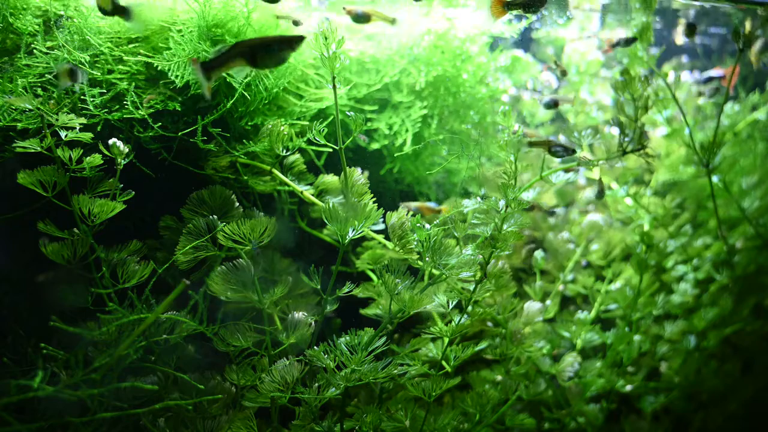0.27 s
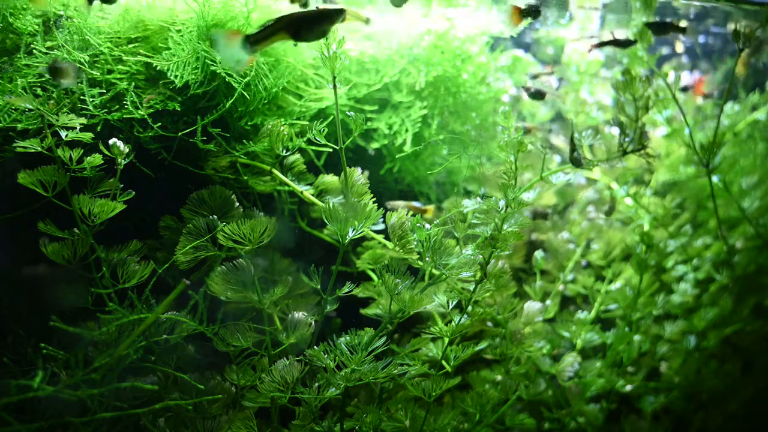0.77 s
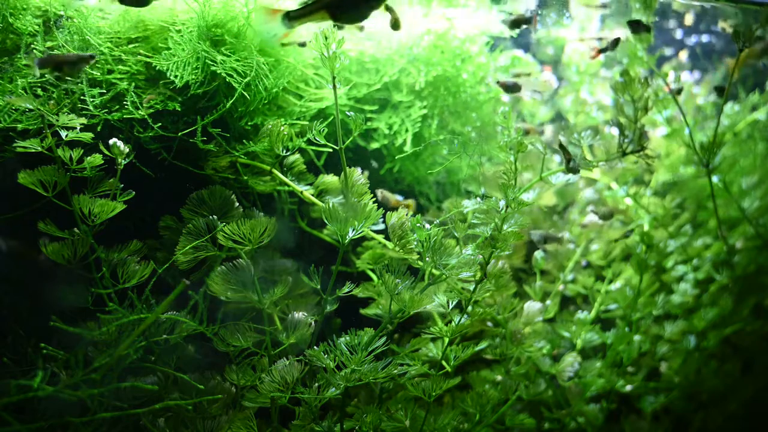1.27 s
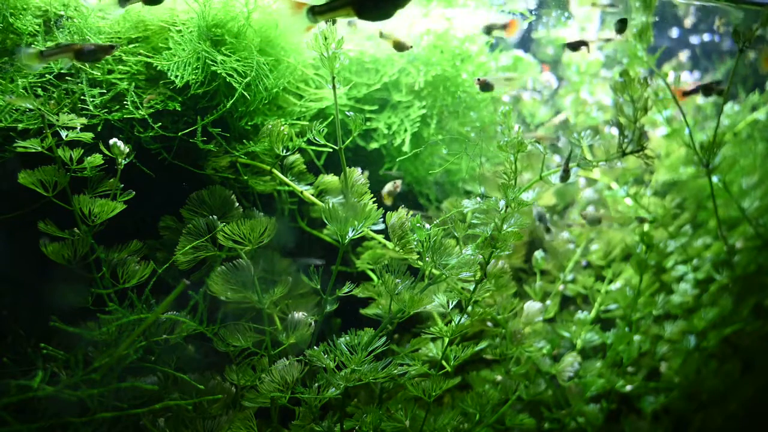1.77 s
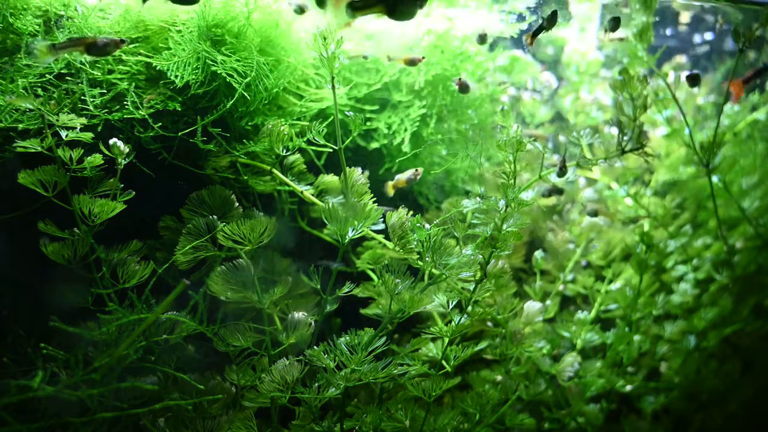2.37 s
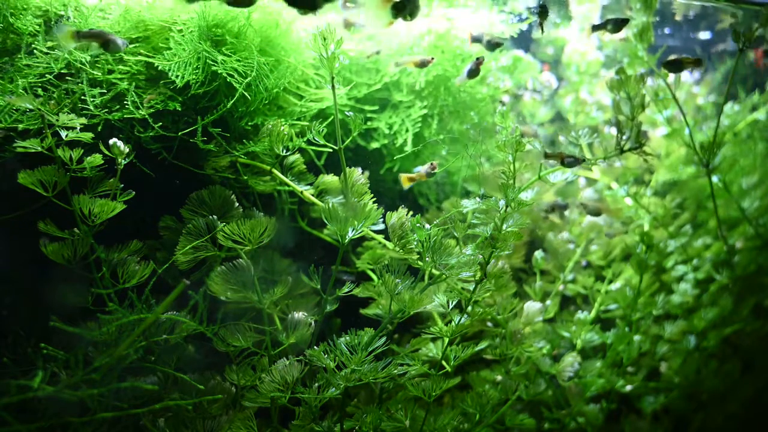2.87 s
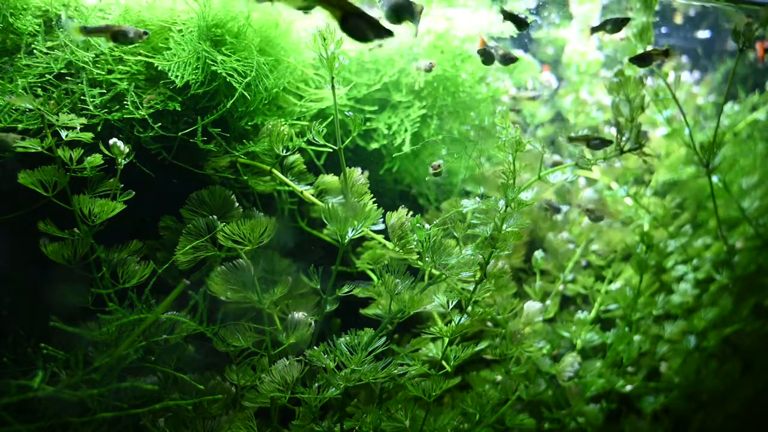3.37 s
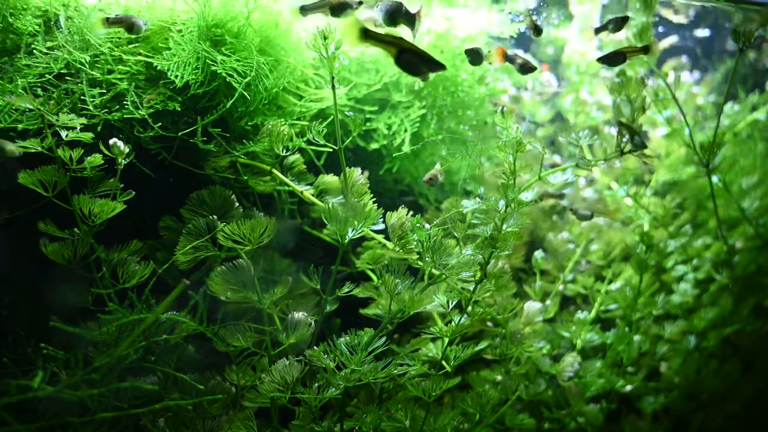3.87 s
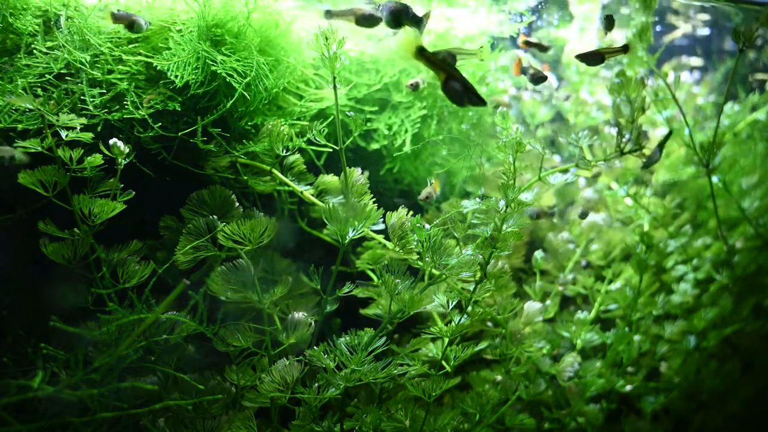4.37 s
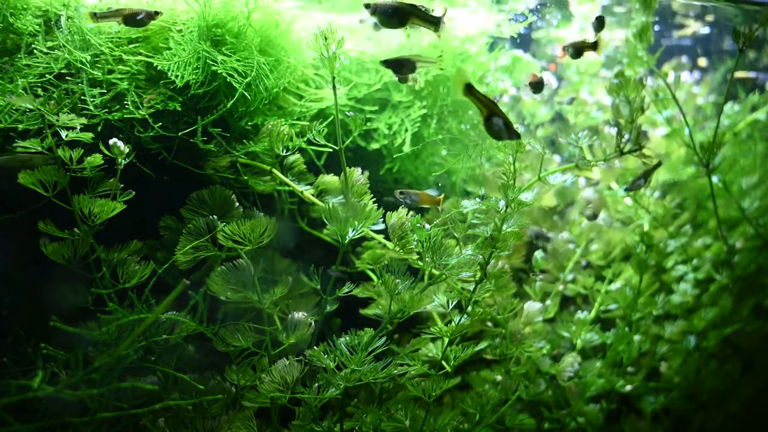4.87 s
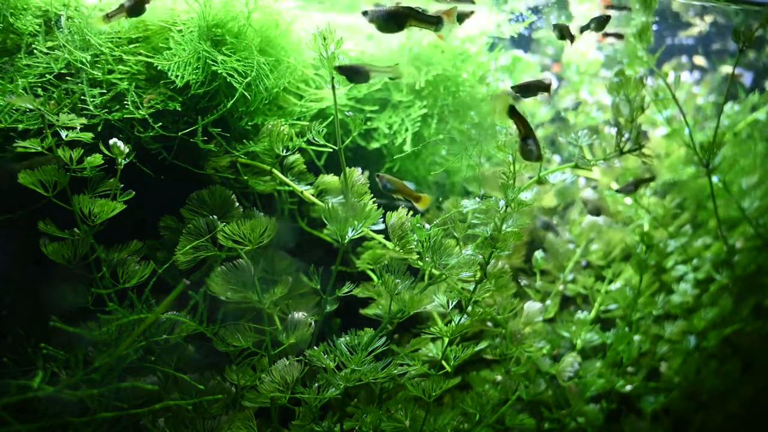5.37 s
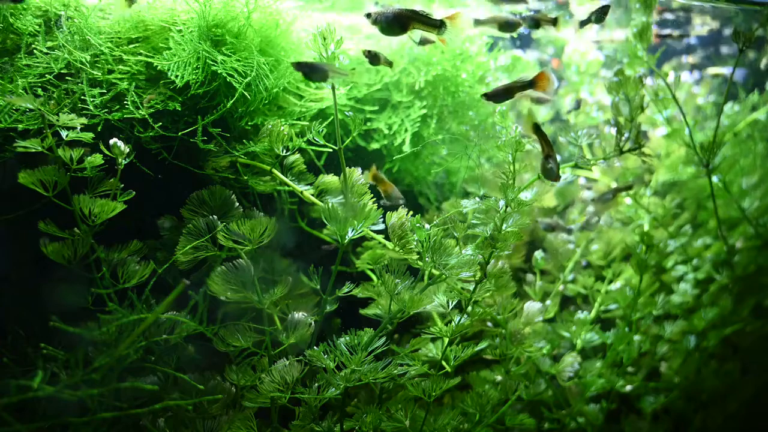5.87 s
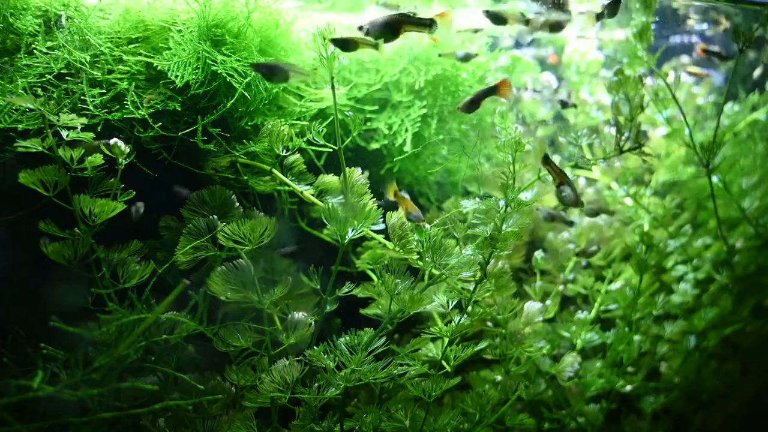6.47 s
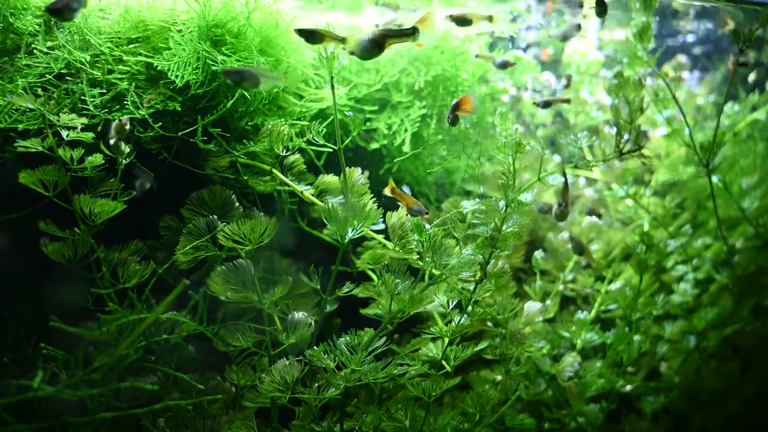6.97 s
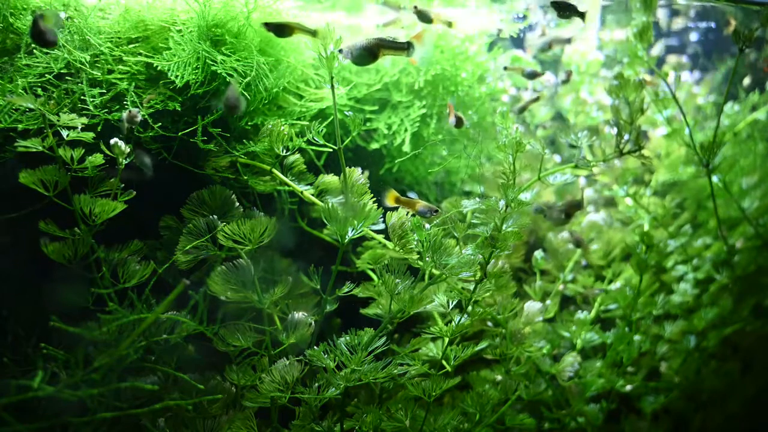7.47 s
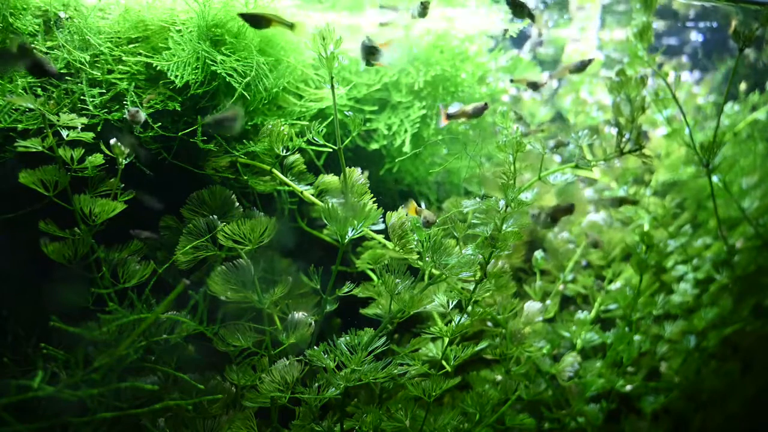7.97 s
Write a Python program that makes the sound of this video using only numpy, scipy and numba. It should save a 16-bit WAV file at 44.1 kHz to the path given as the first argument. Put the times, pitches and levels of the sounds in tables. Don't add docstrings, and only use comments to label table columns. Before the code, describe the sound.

Aquarium pump hums constantly beneath a gentle wash of water while bright little bubbles crackle, tick and plop at random in a quiet room.

```python
import sys
import numpy as np
from scipy import signal
from scipy.fft import rfft, irfft, next_fast_len
from scipy.io import wavfile
from scipy.ndimage import uniform_filter1d
from numba import njit

SR = 44100
rng = np.random.default_rng(int(sys.argv[2]) if len(sys.argv) > 2 else 0)


def boost(x):
    u = np.asarray(x, float) / 20
    return 10 ** u


def digitize_waveform(pressure):
    field = np.atleast_2d(pressure).T
    bounded = np.clip(field, -1, 1)
    quanta = np.round(bounded * 32767).astype(np.int16)
    wavfile.write(sys.argv[1], SR, quanta)


N = 362502
SIZE = next_fast_len(N + SR // 2)
HZ = np.arange(SIZE // 2 + 1) * SR / SIZE
MAINS_HZ = 59.996
PORT_LAG_S = 6 / SR


def along_hz(table):
    hz, value = np.transpose(table)
    return np.interp(np.log(HZ + 1), np.log(hz), value)


def walk(rate):
    hold = int(SR / rate)
    held = np.repeat(rng.standard_normal(N // hold + 1), hold)
    return 1.74 * uniform_filter1d(uniform_filter1d(held, hold), hold)[:N]


def ports(x, lag_s):
    delay = np.exp(-2j * np.pi * HZ * lag_s)
    late = irfft(rfft(x, SIZE) * delay, SIZE)[:len(x)]
    return np.array([late, x])


def diffuse(length, alike_hz, steep):
    both, left, right = rfft(rng.standard_normal((3, SIZE)))
    alike = .985 / (1 + (HZ / alike_hz) ** steep)
    spectrum = np.sqrt(alike) * both + np.sqrt(1 - alike) * np.array([left, right])
    return irfft(spectrum, SIZE)[:, :length]


def hum():
    # multiple of the mains, level/dB rms
    multiples = [(1, -58), (2, -43), (4, -68), (5, -72), (6, -51), (7, -68), (8, -72), (9, -75), (10, -75),
                 (12, -78), (16, -74), (18, -74), (28, -79), (43, -80), (49, -81), (53, -78), (62, -83)]
    # t/s, level/dB rms
    third = [(0.0, -60), (0.07, -61), (0.32, -53), (1.76, -57.5), (2.05, -50), (2.12, -60.5), (3.29, -49),
             (3.47, -65), (4.25, -51), (4.61, -62), (6.12, -51.5), (6.28, -59), (7.1, -64), (7.17, -54.5),
             (7.76, -62), (7.9, -50.5), (8.2, -56)]
    t = np.arange(N) / SR
    impeller_hz, impeller_db = 29.55, -74
    impeller = boost(impeller_db + 2.5 * walk(3)) * np.sin(2 * np.pi * impeller_hz * t)
    out = impeller * np.ones((2, 1))
    third_db = np.interp(t, *np.transpose(third)) - .7
    for k, db in [*multiples, (3, third_db)]:
        wobble_db = min(0.097 * k, .8) * walk(7.7)
        turn = .28 * k ** 2
        lag_s = 1.4 * PORT_LAG_S * np.exp(-k / 22) * np.array([[1], [0]])
        out += boost(db + 3.5 + wobble_db) * np.sin(2 * np.pi * (k * MAINS_HZ * (t - lag_s) + turn))
    return out


def rush():
    # f/Hz, spectral level/dB
    slope = [(20, -14), (40, -11), (80, -6), (200, -3.5), (420, -8), (620, -12), (1100, -10), (1750, -12.5),
             (2300, -15.5), (3100, -14.5), (4000, -18.5), (8000, -21), (11000, -23.5), (16000, -26)]
    # f/Hz, width/Hz, level/dB
    bodies = [(28.8, 5.4, 0), (55, 22, 4.5), (74.7, 5.4, -2), (88, 9, 4), (167, 40, 4), (217, 7.7, -16),
              (253.5, 22, 3), (340, 64, -2.5), (474, 10.6, 5.5), (584, 75, -0.5), (687, 48, 5),
              (822, 115, 5), (1038, 100, 5.5), (1246, 86, 4.5), (1526, 44, 1.5), (1623, 21, 5),
              (2590, 240, 5), (3430, 81, 5)]
    rush_db = -47
    power = 1
    for hz, width, db in bodies:
        power = power + boost(2 * db) / (1 + (2 * (HZ - hz) / width) ** 2) ** 2
    noise = diffuse(N, 1790, 2.94) + boost(-6) * ports(rng.standard_normal(N), PORT_LAG_S)
    spectrum = rfft(noise, SIZE) * boost(along_hz(slope)) * np.sqrt(power)
    stroke = np.exp(1.3 * np.cos(2 * np.pi * MAINS_HZ * np.arange(N) / SR))
    stroke = stroke / stroke.mean() - 1
    octave = np.log2((HZ + 1) / 30)
    flow, spatter = walk(15), walk(35)
    out = 0
    for k in range(10):
        window = np.cos(np.pi / 2 * np.clip(octave - k, -1, 1)) ** 2
        band = irfft(spectrum * window, SIZE)[:, :N]
        throb = .09 * np.exp(-((k - 4.3) / 1.3) ** 2) + .025
        shared_db = .7 * flow * (3 < k < 7) + .07 * k * spatter * (k > 6)
        flicker_db = .8 if k < 7 else .25
        out = out + band * (1 + throb * stroke) * boost(shared_db + flicker_db * walk(9))
    return out * boost(rush_db) / np.sqrt(np.mean(out ** 2))


def lasting_ms(hz):
    return 4.6 * (4000 / hz) ** 0.76


@njit
def rings(start, size, hz, ring_s, glide):
    out = np.zeros(N)
    for k in range(len(start)):
        z = size[k] + 0j
        step = 2 * np.pi * hz[k] / SR
        shut = 1.
        fade = np.exp(-1 / (ring_s[k] * SR))
        for i in range(start[k], min(start[k] + int(6 * ring_s[k] * SR), N)):
            z *= fade * np.exp(1j * step)
            shut *= fade ** 8
            step = min(step * (1 + glide[k] / (ring_s[k] * SR)), 2.3)
            out[i] += (1 - shut) * z.imag
    return out


def bursts(s, db, hz, ring_ms, cycles, scatter, count=4):
    later, pitch, size, slide = rng.random((len(s), 4, count)).transpose(1, 2, 0)
    first = np.arange(count)[:, None] == 0
    start = s + 1.3 * ring_ms / 1000 * later * ~first
    step_hz = np.minimum(hz * np.where(first, 1.05, 1 + scatter * (pitch - .5)), 16000)
    step_db = db - (5.0 + 6.0 * size) * ~first
    ring_s = cycles * (1.14 + 0.049 * ring_ms * np.ones_like(size)) / step_hz
    glide = -.075 * (slide.ravel() + .3)
    start_sample = (start * SR).astype(np.int64).ravel()
    return rings(start_sample, boost(step_db).ravel(), step_hz.ravel(), ring_s.ravel(), glide)


def scattered(top_db, spread_db, low_hz, high_hz, lean, count):
    when, size, pitch = rng.random((count, 3)).T
    hz = low_hz * (high_hz / low_hz) ** pitch ** lean
    return np.transpose([when * N / SR, top_db - spread_db * size, hz])


def room(lag_s):
    # delay/ms, level/dB
    echoes = [
        (5.7, -3.5),
        (11.8, -11),
    ]
    t60_s, tail_db = 0.13, -1.3
    t = np.arange(SR // 3) / SR
    tail = diffuse(len(t), 1500, 2.8) * np.exp(-np.log(1000) * t / t60_s) * np.minimum(t / 0.0014, 1)
    response = tail * boost(tail_db) / np.sqrt(np.sum(tail ** 2) / 2)
    response += ports(1. * (t == t[8]), lag_s)
    for ms, db in echoes:
        response[[0, 1], int(ms * SR / 1000) + rng.integers(0, 9, size=2)] += boost(db)
    return rfft(response, SIZE) / np.sqrt(1 + (900 / (HZ + 1)) ** 4)


def fizz(count=1200):
    when, pitch, size = rng.random((count, 3)).T
    hz = 2000 * (15500 / 2000) ** pitch ** 1.1
    size_db = -55.5 - 0.42 * np.log2(hz / 4000) - 3.25 * np.log(size + 0.018)
    return bursts(when * N / SR, size_db, hz, 7.9, 5.44, 0.19, count=2)


def ticks(rows, larger):
    s, db, hz = rows.T
    pop_s, pop_db = np.vstack([larger, rows]).T[:2]
    spray_hz = rng.uniform(8000, 11500, len(pop_s))
    spray = bursts(pop_s, pop_db + 4.0, spray_hz, 4.0, 0.7, .7, count=6)
    smallest = bursts(s + .0003, db + 12.5, hz, 1.3 * lasting_ms(hz), 2.1, 0.33, count=5)
    return rfft(smallest + spray + fizz(), SIZE) * room(PORT_LAG_S) * boost([[-1.5], [1.0]])


def pops(rows):
    s, db, hz = rows.T
    loud_db = db + 2.76 + 1.3 * np.log2(hz / 3000)
    return rfft(bursts(s, loud_db, hz, lasting_ms(hz), 5.2, 0.25, count=4), SIZE) * room(-1 / SR)


def scene():
    large = [(0.096, -45, 3410), (0.757, -44, 2980), (1.171, -45, 2920), (1.542, -47, 2620),
             (1.764, -37.5, 3000), (1.992, -45.5, 2530), (3.183, -46.5, 2430), (3.603, -44.5, 3450),
             (3.687, -46, 3350), (3.973, -45, 3500), (3.986, -43.5, 2280), (4.222, -42, 2950),
             (4.292, -46, 3390), (4.38, -46, 2440), (4.662, -45, 3370), (4.943, -42.5, 3030),
             (5.378, -45, 3900), (5.926, -45, 3420), (5.981, -39.5, 2210), (6.063, -44, 2580),
             (6.31, -48, 2590), (6.428, -39, 2870), (6.438, -44, 3000), (6.527, -44, 3520),
             (6.776, -43, 3410), (7.321, -46, 2930), (7.534, -39, 2920), (7.831, -42, 3110),
             (8.034, -41, 3320), (8.085, -46, 3430)]
    # t/s, peak level/dB, f/Hz
    pings = [(0.265, -41, 4230), (0.341, -40.5, 6240), (0.585, -39.5, 5900), (0.71, -46.5, 4380),
             (1.14, -46, 4600), (1.72, -49, 7770), (2.345, -44, 4100), (2.739, -45, 4860),
             (3.212, -43, 5140), (3.299, -44, 5700), (3.426, -48, 7440), (3.471, -41.5, 4590),
             (3.556, -45, 5960), (3.716, -40, 4440), (3.876, -46, 4200), (4.069, -46, 5600),
             (4.445, -41.5, 4500), (4.626, -46, 4550), (5.032, -47, 4950), (5.076, -41, 4830),
             (5.114, -47, 4850), (5.244, -46, 5740), (5.273, -47, 4400), (5.515, -40, 4750),
             (5.906, -44, 4460), (6.864, -48, 4600), (7.287, -46, 4350), (7.802, -40.5, 4900),
             (7.831, -45, 5140), (7.978, -46, 5690)]
    # t/s, peak level/dB, f/Hz
    softer_pops = [(0.445, -49, 5000), (1.13, -45, 5400), (1.519, -47, 4800), (1.699, -49, 4690),
                   (1.863, -48, 2600), (2.184, -48, 1900), (2.682, -46, 2550), (2.973, -49, 3430),
                   (3.038, -47, 5710), (3.72, -43, 3480), (4.058, -49, 3850), (4.466, -46, 7000),
                   (4.655, -46, 5590), (4.694, -49, 4750), (4.77, -46, 4330), (4.884, -48, 6200),
                   (5.763, -48, 3320), (6.042, -50, 4750), (6.43, -47, 4500), (6.578, -50, 5040),
                   (6.712, -46, 2580), (6.971, -47, 4900), (7.272, -48, 7420), (7.346, -49, 7900),
                   (7.482, -48, 6770), (7.514, -45, 6900), (7.842, -51, 2860), (8.106, -48, 7110),
                   (8.16, -47, 4500)]
    # t/s, peak level/dB, f/Hz
    tiny = [(0.06, -47, 14650), (0.346, -45, 14620), (0.562, -51, 14510), (0.586, -49, 8520),
            (0.589, -50, 13000), (2.184, -48, 14550), (2.369, -46, 14530), (2.502, -48, 11830),
            (2.505, -49, 10150), (2.685, -50, 14630), (2.866, -51, 14890), (3.119, -42, 15310),
            (3.752, -48, 15310), (3.885, -51, 13720), (4.188, -48, 12600), (4.884, -52, 8670),
            (4.884, -42, 14520), (5.311, -52, 14490), (5.421, -50, 8200), (5.477, -50, 14440),
            (5.536, -47.5, 10140), (6.093, -51, 14790), (6.133, -47, 13770), (6.782, -51.5, 8610),
            (7.482, -51, 8550), (7.487, -48, 14290), (7.832, -49, 13960), (7.893, -46, 15400),
            (8.05, -45, 14100), (6.206, -53, 15400)]
    steady = hum() + rush()
    faint_pops = scattered(top_db=-50, spread_db=5, low_hz=2402, high_hz=7803, lean=0.825, count=35)
    faint_ticks = scattered(top_db=-50.5, spread_db=3, low_hz=8002, high_hz=15502, lean=.45, count=85)
    larger = np.vstack([large, pings, softer_pops, faint_pops])
    smallest = np.vstack([tiny, faint_ticks])
    return steady + irfft(pops(larger) + ticks(smallest, larger), SIZE)[:, :N]


def roll_off(x):
    return signal.sosfilt(signal.butter(12, 15790, fs=SR, output="sos"), x)


def record(dry):
    # f/Hz, left minus right level/dB
    balance = [(60, 0), (110, -.7), (400, -.6), (700, 0), (1300, -1), (4400, -1.5), (8000, -2.5),
               (15000, -3)]
    shade_db = along_hz(balance) / 2
    heard = irfft(rfft(dry, SIZE) * boost([shade_db, -shade_db]), SIZE)[:, :N]
    return roll_off(heard)


dry = scene()
out = record(dry)
digitize_waveform(out)
```